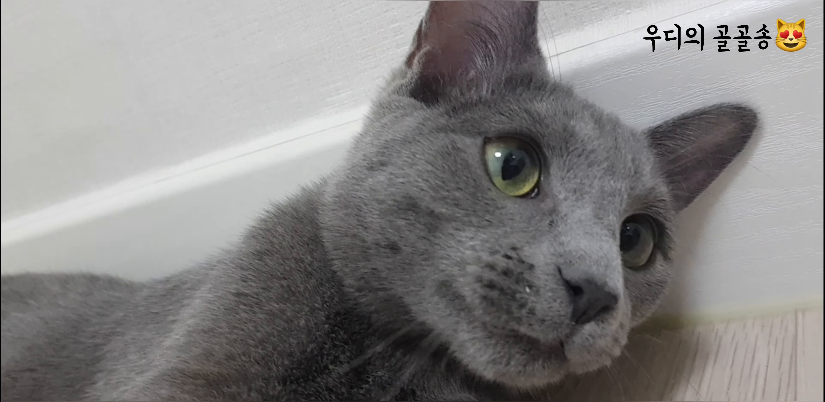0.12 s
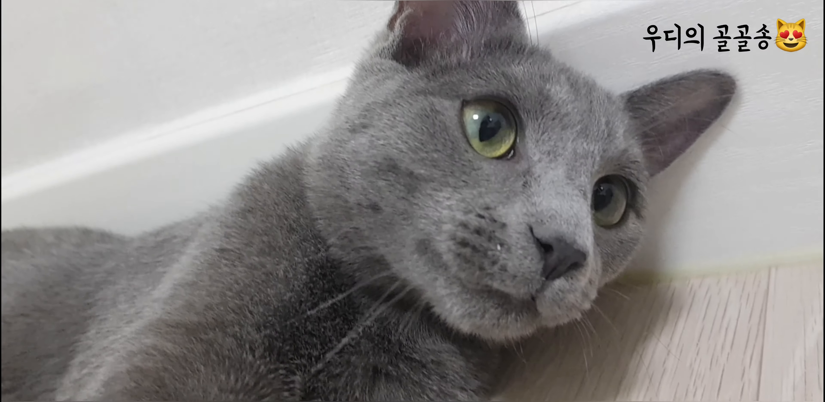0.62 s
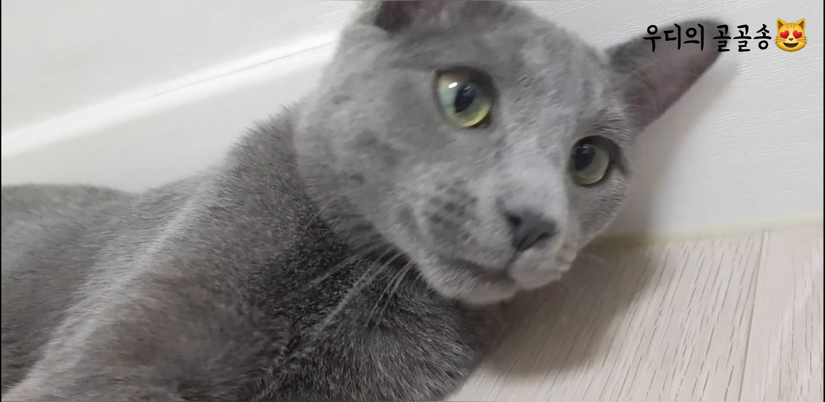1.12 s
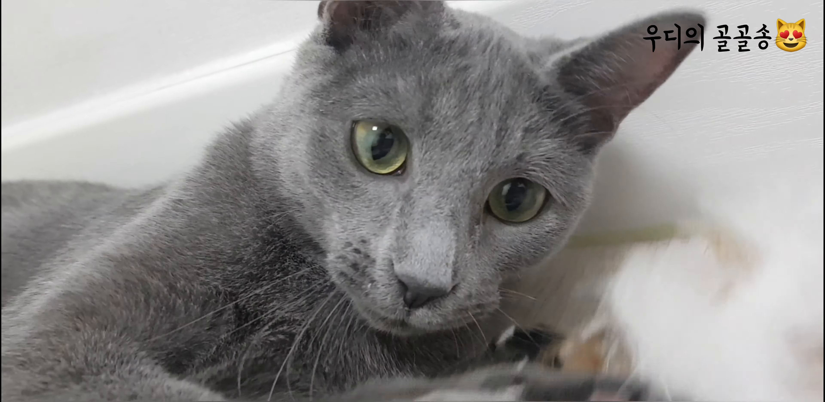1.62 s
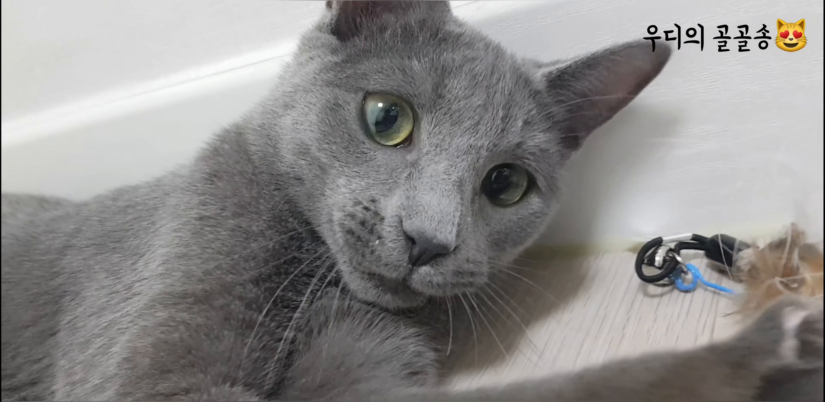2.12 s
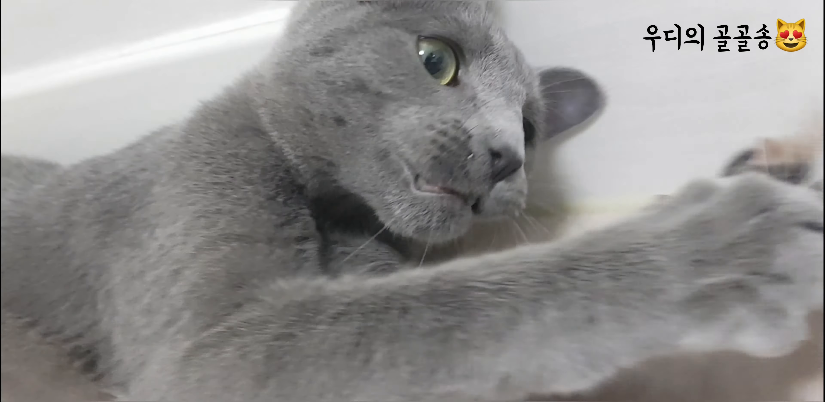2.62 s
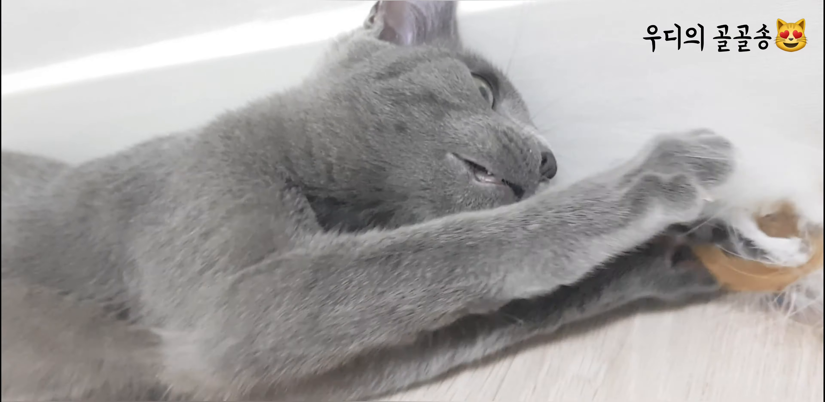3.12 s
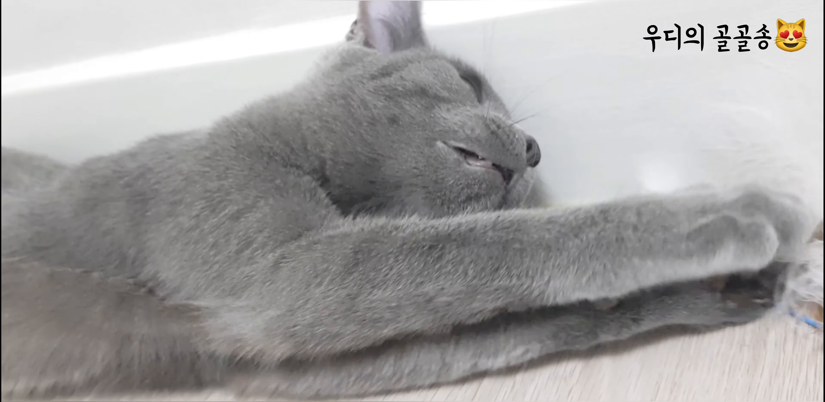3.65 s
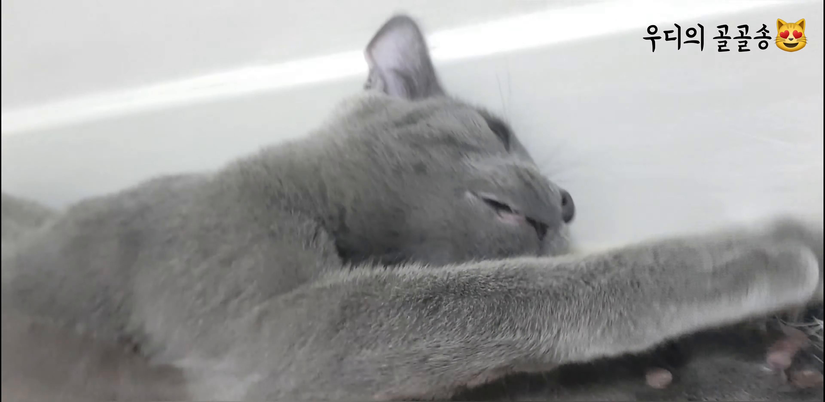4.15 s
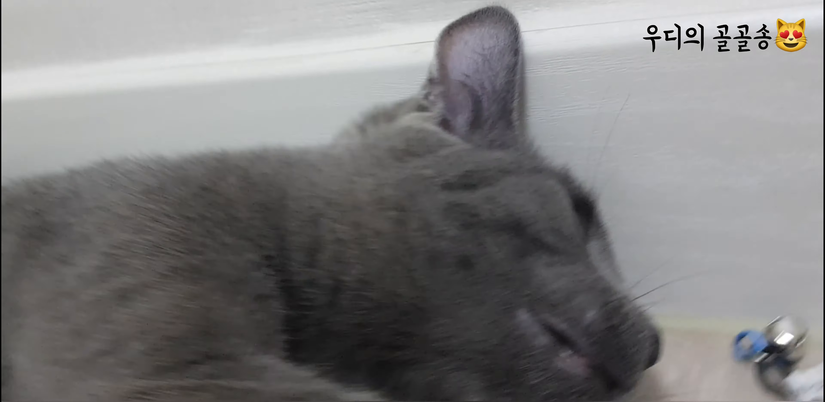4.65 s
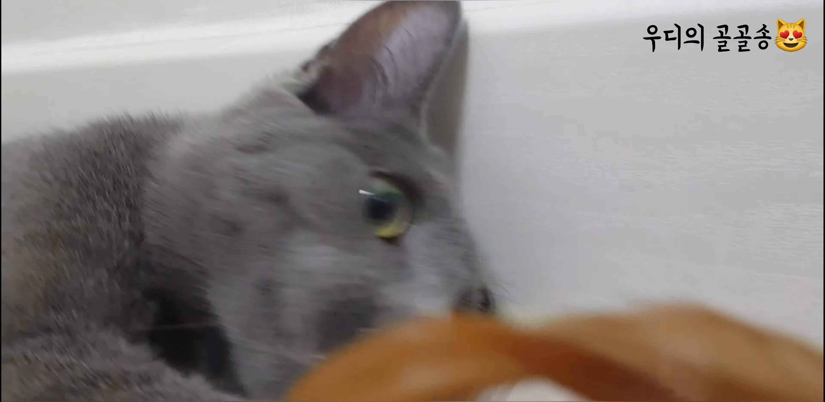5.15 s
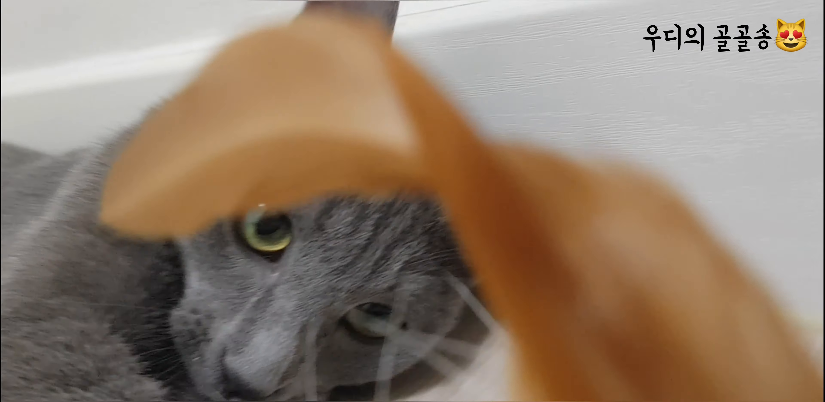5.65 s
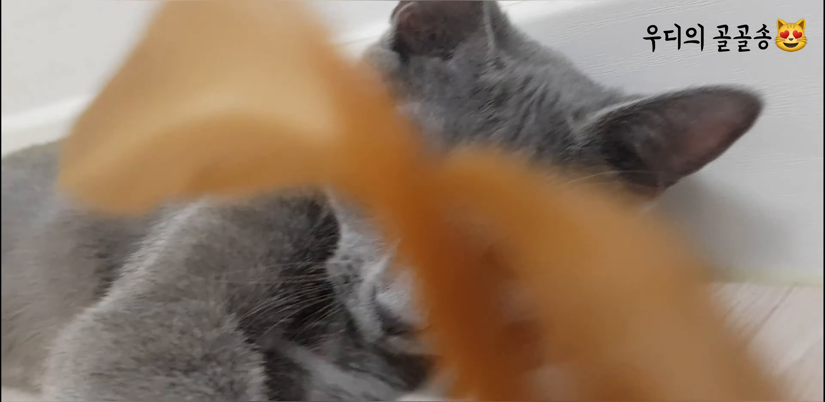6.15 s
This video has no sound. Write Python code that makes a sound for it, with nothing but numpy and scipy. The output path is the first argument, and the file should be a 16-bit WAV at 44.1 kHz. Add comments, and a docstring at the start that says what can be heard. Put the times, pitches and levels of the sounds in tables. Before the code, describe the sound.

Soft low purring runs throughout, changing slightly in tone with each breath. Light brushing of fur begins near one and a half seconds; a hard, bright knock on thin floorboards jumps far above everything else soon after. Scattered dull taps, tiny ticks and tinkles follow, then a long papery rustle. Close microphone, small indoor room with a short tail, low rumble and light hiss.

```python
"""On a laminate floor in a small room, a cat lies purring close by, batting at a feather toy with a bell.
Its larynx twitches some 29 times a second: pulses of air, mostly reversed on the in-breath, drive throat,
nose and chest resonances. Paws and toy scrape (shaped noise) and knock the boards (struck modes), and
claws and whiskers tick; a pellet tinkles the bell's modes. Faint hum, rumble and hiss lie behind."""
import sys
import numpy as np
from scipy import signal
from scipy.fft import rfft, irfft
from scipy.io import wavfile
from scipy.ndimage import uniform_filter1d

SR = 44100
rng = np.random.default_rng(int(sys.argv[2]) if len(sys.argv) > 2 else 0)


def attenuation_scalar(level_db):
    """Turn a level in dB into a linear amplitude multiplier (20 dB per decade)."""
    decades = np.asarray(level_db, float) / 20
    return 10 ** decades


def store_pcm(level_fs):
    """Save levels as 16-bit WAV."""
    pcm = np.round(np.clip(level_fs, -1, 1) * 32767).astype(np.int16)
    wavfile.write(sys.argv[1], SR, np.atleast_2d(pcm).T)


N = 276507
T = np.arange(N) / SR

# breaths, out and in by turns: first snap t/s, twitch rate at start f/Hz, at end f/Hz
BREATH_TIMES = [(0.017, 30.3, 28.2), (0.426, 31.06, 30.05), (1.081, 27.31, 28.42), (1.832, 29.6, 29.52),
                (2.342, 27.37, 26.83), (2.819, 31.22, 27.59), (3.163, 26.46, 28.47), (3.634, 29.66, 27.07),
                (4.095, 26.78, 28.38), (4.67, 28.55, 29.02), (5.193, 27.93, 28.62), (5.861, 29.7, 29.07)]
# swell of the chest boom and of the rumble, before each one's trim: t/s, level/dB
CHEST_SWELL = [(0.0, -46), (0.07, -41.5), (0.31, -49), (0.59, -42), (0.86, -48), (0.98, -44.5), (1.05, -49),
               (1.29, -44.5), (1.45, -52.5), (1.66, -45), (1.94, -48), (2.06, -45), (2.71, -55),
               (2.9, -49.5), (3.35, -53), (3.37, -49), (4.4, -53.5), (4.94, -47), (5.03, -34.5),
               (5.06, -44), (5.36, -45.5), (5.71, -50.5), (6.25, -48), (6.27, -41)]
CHEST_TURN_DB = -1  # chest and rumble at each turn of the breath
# paw and toy knocks: t/s, blow level before the trim/dB, hollow thud re blow/dB,
# bright crack re blow/dB, left minus right/dB
KNOCK_EVENTS = [(2.3, -1, -27.5, -8.5, 3.5), (2.305, -8, -21, -2.5, 8.5), (2.399, -24, -20, -21.5, -3),
                (2.518, -21, -8, -41, -6), (2.541, -25.5, -3.5, -4.5, 5.5), (2.575, -30, -1.5, -0.5, 0),
                (3.086, -26, 0.5, -6.5, 1.5), (3.243, -24.5, -2, -15, 0.5), (3.594, -27, -2, -23.5, 1),
                (4.043, -19, 4.5, -15.5, -1), (4.38, -50, -3.5, -1, -11), (4.406, -36.5, 5.5, -3.5, 1),
                (4.736, -29, -24, -27.5, -4), (5.282, -34.5, -24.5, -12, 1)]


def curve(table, index):
    """One column of a timed table, interpolated to every sample."""
    rows = np.asarray(table)
    return np.interp(T, rows[:, 0], rows[:, index])


def unit(x):
    """Scale to rms 1."""
    return x / np.sqrt(np.mean(x ** 2))


def colour(x, points):
    """Shape the spectrum of x by (f/Hz, level/dB) points, then scale to rms 1."""
    hz, db = np.transpose(points)
    bins_hz = np.arange(N // 2 + 1) * SR / N + 1  # 1 Hz up keeps the log finite
    gain = attenuation_scalar(np.interp(np.log(bins_hz), np.log(hz), db))
    return unit(irfft(rfft(x) * gain, N))


def pair(alike):
    """Stereo noise; alike is the left-right correlation, 0-1."""
    mid, side = rng.standard_normal((2, N))
    return np.sqrt(1 + alike) * mid + np.sqrt(1 - alike) * side * np.array([[1], [-1]])


def walk(rate):
    """Random levels, new ones rate times a second with a slew between; rms 1."""
    k = int(SR / rate)
    steps = np.repeat(rng.standard_normal(N // k + 1), k)
    return unit(uniform_filter1d(steps, k)[:N])


def ring(x, modes):
    """Decaying modes (f/Hz, level/dB, t60/s), each a complex one-pole resonator struck by x."""
    out = 0
    for hz, db, t60 in modes:
        pole = np.exp(2j * np.pi * hz / SR - np.log(1000) / (t60 * SR))
        out = out + attenuation_scalar(db) * signal.lfilter([1], [1, -pole], x).imag
    return out


def pan(x, db):
    """Left louder than right by db."""
    return x * attenuation_scalar(np.array([db, -db]).reshape(2, -1) / 2)


def high(x, hz):
    """Third-order high-pass."""
    return signal.sosfilt(signal.butter(3, hz, "high", fs=SR, output="sos"), x)


def bursts(s, hold, db, rise, fall):
    """Gain of events that rise, hold and fall at steady dB per s; their powers add."""
    power = np.zeros(N)
    for t0, h, top in zip(s, np.broadcast_to(hold, len(s)), db):
        near = slice(max(int((t0 - .2) * SR), 0), int((t0 + h + .5) * SR))
        t = T[near] - t0
        slope_db = np.minimum(rise * t, fall * (h - t))
        power[near] += attenuation_scalar(top + np.minimum(0, slope_db)) ** 2
    return np.sqrt(power)


def turns():
    """Near 1 where the breath turns round, falling to 0 in mid breath."""
    lead_s, width_s = 0.013, 0.046
    return sum(np.exp(-((T - breath[0] + lead_s) / width_s) ** 2) for breath in BREATH_TIMES[1:])


def larynx_flow():
    """Every twitch pushes air a few times; timing, size and width of each push scatter."""
    # pushes of air in one twitch: lag from the snap t/ms, width t/ms, level/dB, sign, shape (0 bump - 1 swing)
    out_twitch = [(-12.5, 1.1, 0, 1, 1), (-.6, .55, -1.5, 1, 1), (-22, 1.3, -10, 1, 0)]
    in_twitch = [(-14, .5, -6, 1, 0), (-9.5, .55, 0, -1, 0), (-.2, .6, -1, -1, 1), (4, .5, -8, 1, 0)]
    last_snap_s = .034  # nominal end of a breath, ahead of the next one's first snap
    margin = 1000  # samples spare at each end
    flow = np.zeros(N + 2 * margin)
    ms = np.arange(-400, 400) * 1000 / SR
    start, rate0, rate1 = np.transpose(BREATH_TIMES)
    last = np.append(start[1:] - last_snap_s, N / SR)
    for k in range(len(start)):
        snap, span, rate = start[k], (start[k], last[k]), (rate0[k], rate1[k])
        while snap < min(last[k] + last_snap_s / 2, N / SR):
            for lag_ms, width_ms, db, sign, swing in (out_twitch, in_twitch)[k % 2]:
                late, size, wide = rng.standard_normal(3)
                u = ms / (width_ms * np.exp(0.11 * wide))
                push = np.exp(-u ** 2 / 2) * (1 - swing + 1.5 * swing * u)
                at = int((snap + (lag_ms + 0.26 * late) / 1000) * SR) + margin
                flow[at - 400:at + 400] += sign * attenuation_scalar(db + 1.4 * size) * push
            # step on by the period at the middle of this twitch
            period = 1 / np.interp(snap, span, rate)
            snap += 1 / np.interp(snap + period / 2, span, rate)
    return unit(flow[margin:N + margin]), start, last


def purr():
    """Pulsed flow and its turbulence excite throat and nose resonances; the flow also rings the chest."""
    # throat resonances: f/Hz, width f/Hz, level/dB
    throat_bands = [(220.2, 66, -3.5), (287.7, 70, -5), (528.5, 110, 3.5), (1259, 1200, -33)]
    # chest modes, levels relative: f/Hz, level/dB, t60 t/s
    chest_modes = [(57.9, 2, 0.16), (96, -3.5, 0.033)]
    # nasal band, stronger while the head lies on the floor: t/s, level under the effort/dB
    nose_level = [(0, -37), (2.9, -33), (3.25, -15), (4.0, -14), (4.45, -21), (4.8, -15), (5.4, -19),
                  (6.27, -19)]
    # effort of each breath: level at start/dB, level at end/dB
    breath_effort = [(-46, -45.5), (-46, -52), (-46, -46.5), (-47, -49), (-48.5, -48), (-54, -53),
                     (-46.5, -51), (-52, -56), (-46, -54), (-47, -46), (-43.5, -48.5), (-47.5, -45)]
    throat_top_hz, nose_hz, nose_width_hz, turn_db = 740.1, 1173, 320, -6

    flow, start, last = larynx_flow()
    turn = turns()
    effort_times = np.ravel([start, last], "F")
    effort_db = np.interp(T, effort_times, np.ravel(breath_effort)) + turn_db * turn
    # turbulence follows each push and lingers a little
    gust = signal.lfilter([.004], [1, -.996], np.abs(flow)) * rng.standard_normal(N)
    source = flow + attenuation_scalar(-2) * unit(gust)

    throat = sum(attenuation_scalar(db) * signal.lfilter(*signal.iirpeak(hz, hz / width, fs=SR), source)
                 for hz, width, db in throat_bands)
    lowpass = signal.butter(7, throat_top_hz, fs=SR, output="sos")
    closed = signal.sosfiltfilt(lowpass, source + throat)  # the muffled voice of the purr
    band = signal.iirpeak(nose_hz, nose_hz / nose_width_hz, fs=SR)
    twice_banded = signal.lfilter(*band, signal.lfilter(*band, source))
    nose = unit(twice_banded) * attenuation_scalar(curve(nose_level, 1))
    voice = (unit(closed) + nose + attenuation_scalar(-22) * unit(throat)) * attenuation_scalar(effort_db)

    chest_db = curve(CHEST_SWELL, 1) + CHEST_TURN_DB * turn - 3.5
    chest = unit(high(ring(flow, chest_modes), 64)) * attenuation_scalar(chest_db)
    return pan(voice, -.8) + pan(chest, -2)


def moves():
    """Dense grains drag over the boards; fur swishes, ribbon hisses and feathers crackle, all wide."""
    # paw swipes, and two long faint shiftings of fur, before the mix:
    # t/s, hold t/s, scrape on the boards level/dB, fur swish level/dB, feather crackle level/dB
    swipes = [(1.147, 0.0036, -83, -76.5, -62), (1.21, 0.268, -84, -76, -71.5),
              (1.584, 0.0354, -59, -55, -53.5), (1.645, .035, -50.5, -41.5, -51.5),
              (1.73, .08, -60, -57, -63), (1.842, 0.0495, -53.5, -46.5, -57),
              (1.929, 0.1212, -45, -45, -54), (2.284, 0.00776, -65.5, -67.5, -54.5),
              (2.329, 0.0299, -32, -32.5, -49.5), (2.36, .025, -37, -44, -53),
              (2.512, 0.052, -40.5, -47, -44), (2.579, 0.0937, -53.5, -56, -64),
              (3.151, 0.0097, -42, -51, -60.5), (3.2, 1.95, -74, -83, -79),
              (3.362, 0.1125, -64.5, -81.5, -91), (3.615, 0.094, -59.5, -68.5, -75.5),
              (3.771, 0.0207, -51.5, -54.5, -64), (4.067, 0.00827, -58.5, -50.5, -63.5),
              (4.425, 0.0194, -63, -61, -65.5), (4.676, .04, -65.5, -71, -63.5),
              (4.755, 0.0066, -49, -53.5, -59.5), (4.804, 0.1124, -62, -65, -62),
              (4.993, 0.01855, -51, -61.5, -78)]
    # the toy is drawn slowly over the cat's head, before the mix:
    # t/s, scrape level/dB, ribbon hiss level/dB, feather crackle level/dB
    drag_levels = [(5.1, -75, -74, -71), (5.14, -61, -70, -80), (5.176, -55.5, -61, -71.5),
                   (5.246, -50.5, -54, -60), (5.362, -51, -51, -59.5), (5.486, -57, -53, -67),
                   (5.544, -51, -51, -60.5), (5.562, -61, -54, -59), (5.674, -61.5, -57, -63),
                   (5.744, -56, -53, -59.5), (5.876, -58, -55, -61.5), (5.95, -54.5, -52.5, -57),
                   (6.16, -65.5, -65.5, -70.5), (6.24, -74, -70.5, -74.5)]
    # the foreleg rubs dully on the floor: t/s, hold t/s, level/dB
    rubs = [(1.637, 0.044, -49), (1.9, 0.0608, -54), (1.979, 0.08, -42.5), (5.248, .14, -57),
            (5.699, 0.112, -54.5)]
    # relative spectra of the five textures: f/Hz, level per Hz/dB
    scrape_tone = [(350, -30), (750, -15), (950, -4), (1160, 0), (1400, -6), (1900, -20), (2800, -45)]
    fur_tone = [(1000, -35.5), (1600, -4.5), (1950, -10), (2450, -0.5), (2900, -1.5), (3600, -1),
                (4500, -7.5), (5500, -18.5), (7000, -28)]
    ribbon_tone = [(1300, -13), (1800, -13.5), (2050, -20.5), (2500, -8.5), (3150, -7), (3650, -1),
                   (4150, -6), (4700, -13), (6000, -14), (7800, -38.5)]
    feather_tone = [(3500, -12), (5000, -1.5), (6500, -1.5), (8500, -6.5), (10500, -10), (12500, -5.5),
                    (15000, -20.5)]
    rub_tone = [(120, -25), (280, 0), (600, 3), (900, -1.5), (1300, -27)]
    ribbon_db, feather_db = 2.5, 4  # mix trims
    rise_db_per_s, fall_db_per_s = 401, (260.5, 237, 220)  # falls of scrape, fur, feather
    # after each knock the toy skids: scrape re the blow, fur and feather re its crack
    skid_db, skid_lag_s = (-25, -15, -32), .012

    s, hold, *swipe_db = np.transpose(swipes)
    hit, blow_db, _, crack_db, _ = np.transpose(KNOCK_EVENTS)
    gain = []
    for k in range(3):
        swipe = bursts(s, hold, swipe_db[k], rise_db_per_s, fall_db_per_s[k])
        skid_level = blow_db + skid_db[k] + crack_db * (k > 0)
        skid = bursts(hit + skid_lag_s, 0, skid_level, 3100, 699)
        gain.append(np.hypot(swipe, skid))
    drag = [attenuation_scalar(curve(drag_levels, k)) * (T > drag_levels[0][0]) for k in (1, 2, 3)]

    # sparse grains of random size, 6 % of the samples
    grit = attenuation_scalar(1.9 * rng.exponential(size=(2, N))) * (rng.random((2, N)) < .06)
    scrape = colour(pair(.7) * grit[0], scrape_tone) * np.hypot(gain[0], drag[0])
    scrape = scrape * attenuation_scalar(1.5 * walk(60))
    fur = colour(pair(.1) * attenuation_scalar(3 * walk(300)), fur_tone) * gain[1] * attenuation_scalar(.8 * walk(40))
    ribbon = colour(pair(.1), ribbon_tone) * drag[1] * attenuation_scalar(ribbon_db + 1.2 * walk(40))
    feather = colour(pair(.1) * (.6 + grit[1]), feather_tone) * np.hypot(gain[2], drag[2])
    feather = feather * attenuation_scalar(feather_db + .8 * walk(50))
    rub = colour(pair(1) * grit[0], rub_tone) * bursts(*np.transpose(rubs), 220, 250)
    return scrape + rub + pan(fur + ribbon, -2.7) + pan(feather, -4)


def knocks():
    """Each blow rings the boards, the hollow under them and a short crack."""
    # modes of the boards, the hollow and the crack, levels relative: f/Hz, level/dB, t60 t/s
    board_modes = [(945, -1.5, .028), (1125, 1, .028), (1480, -5, .015), (2030, -8, .012)]
    thud_modes = [(360, 3, .02)]
    crack_modes = [(2500, -4, .015), (2969.4, 4.5, 0.007), (3454, 2.5, 0.0067)]
    trim_db, contact_ms = -5, 0.1983

    s, db, thud_db, crack_db, pan_db = np.transpose(KNOCK_EVENTS)
    side = attenuation_scalar(np.array([pan_db, -pan_db]) / 2)
    blows = np.zeros((3, 2, N))
    for blow, rel_db in zip(blows, (0, thud_db, crack_db)):
        blow[:, ((s + .0007) * SR).astype(int)] = -side * attenuation_scalar(trim_db + db + rel_db)
    bright = ring(blows[0], board_modes) + pan(ring(blows[2], crack_modes), -12.5)
    # thin boards radiate little bass
    rung = high(bright, 600) + high(ring(blows[1], thud_modes), 120)
    # the contact lasts a moment, which rounds the attack
    contact = np.hanning(int(contact_ms * SR / 1000))
    return signal.lfilter(contact / contact.sum(), [1], rung)


def ticks():
    """Tiny dry claw and whisker ticks: single impulses ring very short treble modes."""
    # ticks: t/s, level before the trim/dB, left minus right/dB
    tick_events = [(1.1301, -46, 2), (1.2928, -50, 4), (1.564, -39.5, -1.5), (1.641, -32.5, -6.5),
                   (2.302, -14, -15.5), (2.4566, -40.5, -14.5), (2.4897, -25, -9), (2.597, -31.5, -12),
                   (2.7066, -59, 3), (3.0865, -41, -4), (3.6185, -53, -7.5), (3.7851, -49, -6),
                   (3.9811, -45.5, 1.5), (4.044, -35.5, -12), (4.3803, -48, -6), (4.405, -44.5, -6),
                   (4.737, -37.5, -21.5), (4.8128, -46, 10.5)]
    # modes, levels relative: f/Hz, level/dB, t60 t/s
    tick_modes = [(5230, -0.5, 0.0025), (7500, -0.5, 0.0024), (9215, -3, 0.0013)]
    s, db, pan_db = np.transpose(tick_events)
    taps = np.zeros((2, N))
    taps[:, (s * SR).astype(int)] = attenuation_scalar(db - 3 + np.array([pan_db, -pan_db]) / 2)
    return ring(taps, tick_modes)


def bell():
    """The pellet rattles in the shell; each contact favours other modes."""
    # shakes of the bell: t/s, hold t/s, low modes level/dB, high modes level/dB
    jingles = [(1.57, .13, -65.5, -63.5), (1.836, 0.27, -71.5, -65.5), (2.29, 0.143, -69, -62.5),
               (2.501, 0.026, -55, -52), (2.597, 0.036, -71.5, -55.5), (3.106, 0.1015, -69, -67),
               (3.789, .01, -73.5, -71.5), (4.05, 0.0252, -67, -68), (4.41, .01, -74.5, -67),
               (4.732, .04, -65, -71.5), (4.841, 0.051, -74, -71), (5.272, 0.204, -68.5, -83),
               (5.678, .08, -62, -86), (5.904, 0.0986, -65.5, -84)]
    # pellet strikes that stand out, median levels: t/s, low modes level/dB, high modes level/dB
    tinks = [(2.019, -61.5, -45.5), (2.059, -51.5, -65.5), (2.49, -53, -39.5), (3.09, -71, -61.5),
             (4.055, -54, -52.5), (4.411, -74.5, -57.5), (4.738, -45.5, -53), (4.849, -72, -60)]
    # shell modes, levels relative: f/Hz, level/dB, t60 t/s
    low_modes = [(4958, -1, .12), (5485, -4, .1), (5515, -1, .11)]
    high_modes = [(8263, -12, .04), (11445, -4, .05), (11703, -4, .05), (12960, -4, .06), (13006, 0, .08)]
    s, hold, *shake_db = np.transpose(jingles)
    hits = rng.random(N) < 160 / SR  # about 160 contacts a second
    out = 0
    for index, modes in enumerate((low_modes, high_modes), start=1):
        shake = bursts(s, hold, shake_db[index - 1], 496, 166)
        for mode in modes:
            taps = hits * shake * attenuation_scalar(4 * rng.standard_normal(N))
            for tink in tinks:
                taps[int(tink[0] * SR)] += attenuation_scalar(tink[index] + 2 * rng.standard_normal())
            out = out + ring(taps, [mode])
    return pan(out, -6)


def room(x):
    """A short noisy tail in four bands, different at each side, starting 6 ms after the sound."""
    # tail bands, levels before the trim: f/Hz, t60 t/s, level/dB
    tail_bands = [(310.6, 0.43, -16), (1002, 0.35, -15), (2960, 0.14, -8), (8460, 0.24, -17.5)]
    t = T[:SR // 2]
    tail = 0
    for hz, t60, db in tail_bands:
        sos = signal.butter(2, [hz / 1.8, hz * 1.8], "band", fs=SR, output="sos")
        noise = signal.sosfilt(sos, rng.standard_normal((2, len(t))))
        decay = np.exp(-np.log(1000) * t / t60) * (t > .006)
        tail = tail + attenuation_scalar(db - 20.5) * noise * decay
    return x + signal.fftconvolve(x, tail, axes=1)[:, :N]


def background():
    """Mains hum, a low rumble that swells with the chest boom, and a steady hiss."""
    # relative spectra: f/Hz, level per Hz/dB
    rumble_tone = [(25, 2), (38, -6), (47, 2.5), (60, 5), (95, 5), (150, 4), (400, -10), (700, -47.5)]
    hiss_tone = [(470, 12), (800, -5), (1730, -1.5), (2310, -11.5), (2970, -1), (4160, -5.5), (7020, -10.5),
                 (9470, -21.5), (12000, -4.5), (14800, -5.5), (15800, -15.5)]
    hum_hz, hum_db, hiss_db = 59.2, -55, -59
    hum_lag = np.array([[0], [.5]])  # radians; the hum comes later on the right
    hum = attenuation_scalar(hum_db + 1.5 * walk(3)) * np.sin(2 * np.pi * hum_hz * T - hum_lag)
    rumble_db = curve(CHEST_SWELL, 1) + CHEST_TURN_DB * turns() - 2
    rumble = colour(pair(.85), rumble_tone) * attenuation_scalar(rumble_db)
    hiss = colour(pair(0), hiss_tone) * attenuation_scalar(hiss_db)
    return hum + pan(rumble, -3.1) + hiss


def scene():
    """All sources; knocks, ticks and bell ring in the room."""
    return purr() + moves() + room(knocks() + ticks() + bell()) + background()


def low_pass(x):
    """Removes everything above the highest recorded frequency."""
    return signal.sosfilt(signal.butter(12, 16520, fs=SR, output="sos"), x)


def record(dry):
    """The microphone drops the deepest bass, clips at full scale and loses the top above 15.5 kHz."""
    clipped = np.clip(high(dry, 50), -1, 1)
    heard = signal.sosfilt(signal.ellip(8, .2, 70, 15500, fs=SR, output="sos"), clipped)
    return low_pass(heard)


dry = scene()
out = record(dry)
store_pcm(out)
```